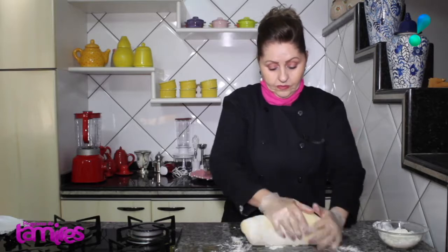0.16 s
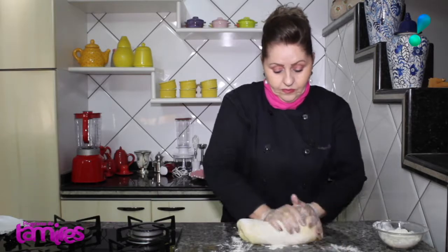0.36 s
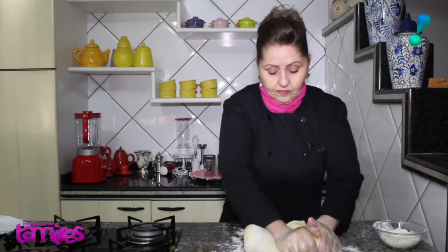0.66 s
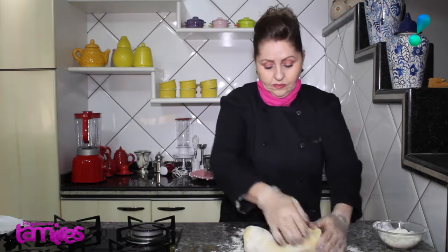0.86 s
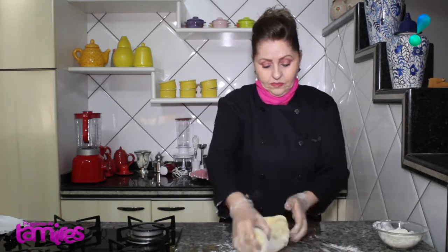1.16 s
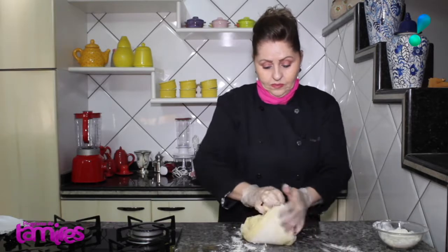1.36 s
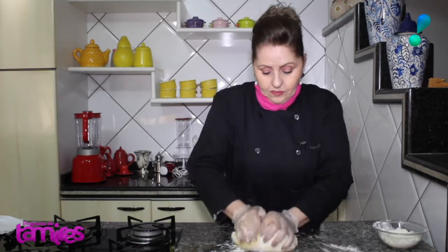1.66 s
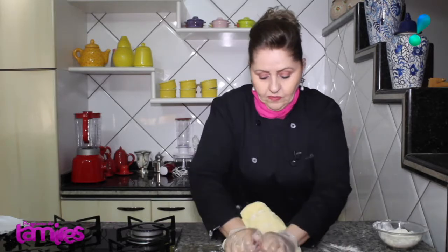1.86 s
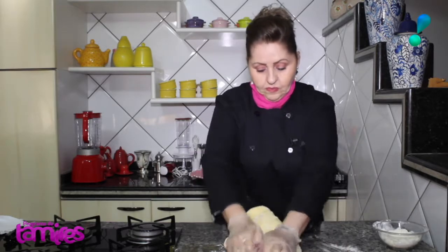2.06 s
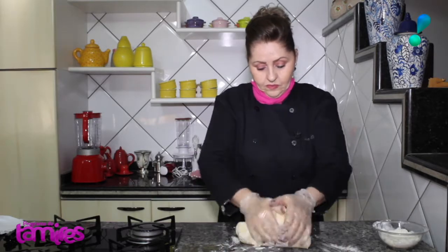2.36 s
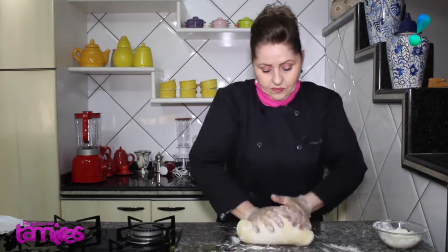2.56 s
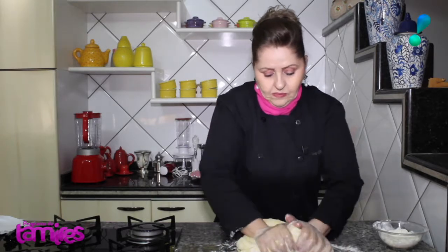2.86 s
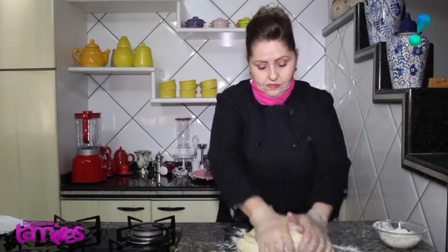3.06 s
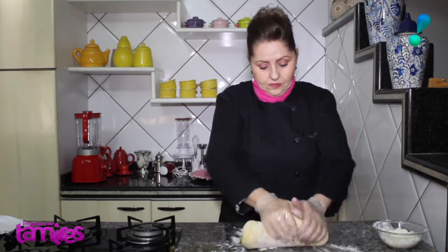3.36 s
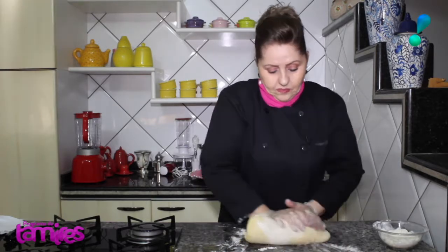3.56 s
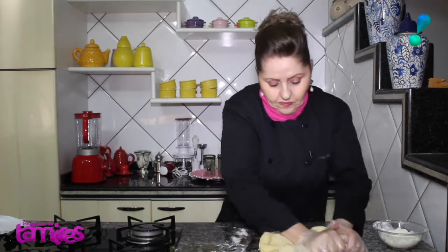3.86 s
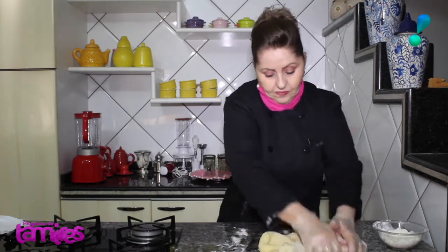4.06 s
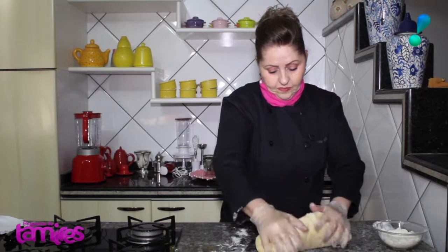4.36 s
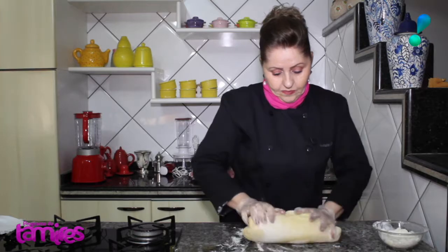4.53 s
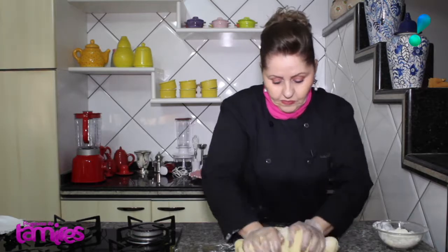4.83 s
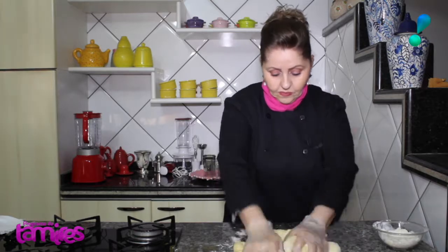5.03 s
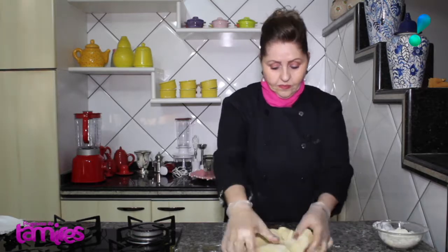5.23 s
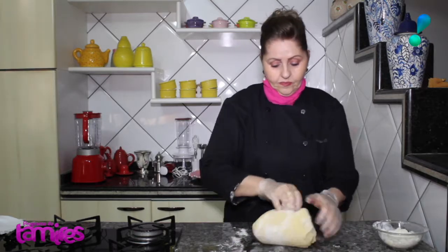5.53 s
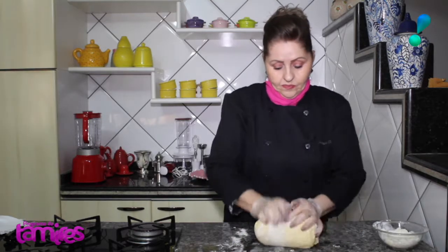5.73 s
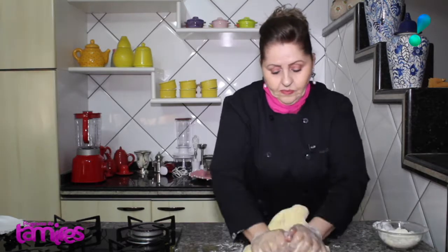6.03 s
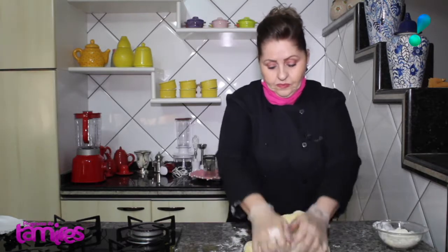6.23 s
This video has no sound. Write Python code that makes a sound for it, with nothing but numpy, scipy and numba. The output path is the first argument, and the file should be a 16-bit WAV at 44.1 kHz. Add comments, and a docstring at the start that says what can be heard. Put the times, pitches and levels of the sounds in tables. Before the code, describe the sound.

Soft crinkling of plastic film opens over faint air, then a crisp snap and dough thud arrive before one second. Irregular crackling strokes continue, each with muffled pops, little squeaks of squeezed air and sleeve-like rubbing, with calmer rustling between. After five seconds the bursts come closer together. Heard near the hands, nearly mono, in a short bright tiled kitchen.

```python
"""Hands in thin plastic gloves knead a stiff dough on a stone counter in a tiled kitchen, for 6.4 s.
The room's hush, soft rubbing and a faint rustle run throughout. Small crumples of film open the scene;
from 0.8 s firm pushes crackle, snap and pop, with the hardest slap and snap just after 4.1 s. Closer
bursts follow from 5.1 s to the end. Film is made of ringing clicks, air of shaped noise, thuds of
short falling tones; tile and wall echoes surround the hands."""
import sys
import numpy as np
from scipy import signal
from scipy.fft import rfft, irfft, next_fast_len
from scipy.io import wavfile
from numba import njit

SR = 44100
rng = np.random.default_rng(int(sys.argv[2]) if len(sys.argv) > 2 else 0)


def transcribe(signal):
    """Save signal, clipped to [-1, 1], as a 16-bit WAV file at the path in sys.argv[1]."""
    frames = np.atleast_2d(signal).T
    limited = np.clip(frames, -1, 1)
    pcm = np.round(limited * 32767).astype(np.int16)
    wavfile.write(sys.argv[1], SR, pcm)


N = 281790
STEP = 32  # samples between updates of slow controls


def from_db(db):
    """Decibels to gain."""
    return 10 ** (np.asarray(db) / 20)


def rms_one(x):
    """Scaled to rms 1."""
    return x / np.sqrt(np.mean(x ** 2) + 1e-20)


def peak_one(x):
    """Scaled to peak 1."""
    return x / np.abs(x).max()


def in_time(rows):
    """Columns of a curve at every control step."""
    s, *columns = np.transpose(rows)
    t = np.arange(N // STEP + 1) * STEP / SR
    return [np.interp(t, s, column) for column in columns]


def drift(rate_hz):
    """Slow chance of spread 1 at every control step: noise through a double smoothing."""
    r = np.exp(-2 * np.pi * rate_hz * STEP / SR)
    settle_in = 2000  # steps dropped while the smoothing fills
    white = rng.standard_normal(N // STEP + 1 + settle_in)
    return rms_one(signal.lfilter([1], [1, -2 * r, r * r], white)[settle_in:])


def coloured(white, spectrum):
    """White noise shaped to a spectrum; rms 1."""
    hz, db = np.transpose(spectrum)
    size = next_fast_len(N)
    grid = np.arange(size // 2 + 1) * SR / size + 1
    gain = from_db(np.interp(np.log(grid), np.log(hz), db))
    return rms_one(irfft(rfft(white, size) * gain, size)[..., :N])


def hush():
    """The room's steady air: shaped noise, partly its own in each channel."""
    # Each row: frequency in Hz, density of the air noise in dB per Hz (relative).
    air_colour = [(24, -51), (40, -25), (121, -5.5), (220, -4), (467, -3), (918, -7.5), (3830, -11),
                  (7730, -15.5), (12100, -18), (16000, -26)]
    level_db, alike = -54, 0.66  # alike: correlation of left and right
    mid, side = rng.standard_normal((2, N))
    stereo = np.sqrt(1 + alike) * mid + np.sqrt(1 - alike) * side * [[1], [-1]]
    return from_db(level_db) * coloured(stereo, air_colour)


def kitchen(x):
    """Walls as four feedback delays a side, duller on every round."""
    t60_s, wall_cut_hz = 0.22, 330  # decay time of the lowest notes, corner of the dulling
    size = next_fast_len(N + SR // 2)
    w = 2 * np.pi * np.arange(size // 2 + 1) / size
    dull = 1 / np.sqrt(1 + (w * SR / (2 * np.pi * wall_cut_hz)) ** 2)
    walls = np.zeros((2, len(w)), complex)
    for k, lag in enumerate(np.round(rng.uniform(0.008, 0.054, size=8) * SR)):
        loop = from_db(-60 * lag / SR / t60_s) * dull * np.exp(-1j * w * lag)
        walls[k % 2] += loop / (1 - loop) * (-1) ** (k // 2)
    return irfft(rfft(x, size) * walls, size)[:, :N]


def tiles(x):
    """One bright early echo off the tiles, a little later on the right."""
    left_s, right_s = 0.0031, 0.0047
    return np.array([np.pad(x, (round(s * SR), 0))[:N] for s in (left_s, right_s)])


def rub():
    """Low, slightly lumpy friction of sleeves and of dough dragged over the stone, as shaped noise."""
    # Each row: time in seconds, rubbing level in dB before the lumps.
    strokes = [(0.0, -63.5), (0.59, -59), (0.69, -57), (1.07, -55.5), (1.23, -59.5), (1.55, -60),
               (2.06, -49), (2.26, -57), (2.69, -61.5), (2.97, -51), (3.31, -61), (3.98, -51), (4.45, -57),
               (4.57, -56), (4.73, -66.5), (5.29, -47), (5.57, -55), (6.39, -50.5)]
    # Each row: frequency in Hz, density of the friction noise in dB per Hz (relative).
    friction_colour = [(24, -51), (40, -26), (118, 0), (209, 1.5), (458, -1.5), (927, -8.5), (2000, -9),
                       (2600, -19), (4400, -120)]
    lumps_db = 2 * drift(25)
    steps = from_db(in_time(strokes)[0] + lumps_db)
    level = np.interp(np.arange(N) / STEP, np.arange(len(steps)), steps)
    return level * coloured(rng.standard_normal(N), friction_colour)


def ring(clicks, hz, t60):
    """A unit click sets a sine of starting height 1 ringing, 60 dB down after t60 seconds."""
    r, w = from_db(-60 / (t60 * SR)), 2 * np.pi * hz / SR
    return signal.lfilter([0, np.sin(w)], [1, -2 * r * np.cos(w), r * r], clicks + 1e-18)


def thuds():
    """A pop of a few cycles, falling in pitch, with a small knock on top and the counter's dull notes."""
    # Dough meets stone or lets go of air. Each row: start in seconds, peak of the pop in dB,
    # reference pitch of the pop in Hz, strength of the blow on the counter in dB.
    blows_on_stone = [(0.282, -49, 470, -51), (0.76, -33.5, 447, -60), (0.804, -33, 517, -57),
                      (0.819, -26, 477, -63), (0.831, -34, 520, -57), (1.179, -43, 444, -73),
                      (1.255, -37, 344, -65), (1.576, -41.5, 547, -57), (1.623, -33, 483, -54),
                      (1.911, -25.5, 470, -62), (2.134, -28, 525, -80), (2.453, -50, 316, -49),
                      (2.631, -37, 370, -59), (2.927, -51, 360, -54), (3.027, -24.5, 560, -37.5),
                      (3.105, -33.5, 475, -64), (3.504, -54, 544, -50.5), (4.04, -53, 501, -54),
                      (4.121, -24, 322, -48), (4.125, -40, 337, -52), (4.41, -42, 320, -50.5),
                      (4.795, -38.5, 534, -60), (5.097, -34, 334, -34.5), (5.826, -27, 377, -44.5),
                      (5.845, -37, 483, -54), (6.026, -28.5, 514, -46), (6.264, -33, 467, -67)]
    # Notes of the stone counter. Each row: frequency in Hz, gain in dB, decay t60 in seconds.
    counter_notes = [(130, 10, 0.023), (205, 15, 0.017)]
    out, blows, t = np.zeros(N + 2000), np.zeros(N), np.arange(2000) / SR
    for s, db, hz, counter_db in blows_on_stone:
        cycles = hz * t
        falling_phase = 2 * np.pi * 8.43 * (1 - np.exp(-cycles / 7.06))
        pop = np.sin(falling_phase) * from_db(-60 * cycles / 8.0)
        knock = 0.4 * np.sin(2 * np.pi * 2.2 * cycles) * from_db(-60 * cycles / 2.5)
        onset = 1 - np.exp(-cycles / 0.24)
        at = round(s * SR)
        out[at:at + 2000] += from_db(db) * peak_one((pop + knock) * onset)
        blows[at + round(0.0015 * SR)] = from_db(counter_db)
    # dough is a soft hammer
    band = signal.butter(2, [95, 400], "band", fs=SR, output="sos")
    soft = signal.sosfilt(band, blows + 1e-18)
    return out[:N] + sum(from_db(db) * ring(soft, hz, t60) for hz, db, t60 in counter_notes)


def slaps():
    """A short broad puff of air from under the palm: a decaying band of noise."""
    # A palm lands flat on the dough. Each row: start in seconds, peak in dB.
    palms = [(0.811, -39), (0.831, -27.5), (3.095, -40.5), (4.111, -28.5), (4.127, -21), (5.112, -37),
             (6.242, -33), (6.269, -34)]
    out, t = np.zeros(N + 2500), np.arange(2500) / SR
    band = signal.butter(2, [450, 1700], "band", fs=SR, output="sos")
    shape = from_db(-60 * t / 0.096) * (1 - np.exp(-t / 0.0005))
    for (s, db), white in zip(palms, rng.standard_normal((len(palms), 2500))):
        at = round(s * SR)
        out[at:at + 2500] += from_db(db) * peak_one(signal.sosfilt(band, white * shape))
    return out[:N]


def pockets():
    """Escaping air whistles: a gliding tone with a noisy strength, its breadth a share of its pitch."""
    # Air squeezed out of a pocket in glove or dough. Each row: start in seconds, length in seconds,
    # first pitch in Hz, last pitch in Hz, rms level in dB before the fade in and out.
    whistles = [(0.816, 0.033, 2550, 2520, -56), (0.892, 0.045, 10600, 12640, -40.5),
                (1.151, 0.054, 4090, 3745, -44), (1.54, 0.026, 2215, 2240, -46.5),
                (2.114, 0.05, 2066, 1850, -36.5), (2.127, 0.046, 8720, 9540, -37),
                (2.356, 0.017, 12500, 12000, -41.5), (2.682, 0.038, 2780, 2950, -43),
                (3.589, .07, 2770, 2876, -42.5), (3.783, 0.057, 502, 680, -44.5),
                (4.111, 0.021, 4980, 4920, -34.5), (4.12, .025, 1260, 1300, -39),
                (4.161, 0.023, 5800, 5860, -44.5), (4.168, 0.047, 11700, 11900, -48),
                (5.11, 0.018, 7000, 6800, -31.5), (5.287, 0.14, 1910, 1696, -41),
                (5.8, 0.027, 7060, 7040, -41), (5.974, 0.041, 8100, 8000, -39.5),
                (6.255, 0.025, 1742, 1830, -41)]
    out = np.zeros(N)
    for s, length, first_hz, last_hz, db in whistles:
        n, at = round(length * SR), round(s * SR)
        phase = 2 * np.pi * np.cumsum(np.linspace(first_hz, last_hz, n)) / SR
        low = signal.butter(2, 0.097 * first_hz, fs=SR, output="sos")
        hoarse = signal.sosfilt(low, rng.standard_normal((2, 9000)))[:, -n:]
        tone = rms_one(hoarse[0] * np.sin(phase) + hoarse[1] * np.cos(phase))
        fade = np.sin(np.linspace(0, np.pi, n)) ** 0.21
        out[at:at + n] += from_db(db) * tone * fade
    return out


def patch(clicks, hz, cycles):
    """A small piece of film: a resonance passed twice, so that it is heard only near its pitch."""
    r, w = from_db(-60 * hz / (cycles * SR)), 2 * np.pi * hz / SR
    resonance = [0.65, 0.0039, -1.05, 1, -2 * r * np.cos(w), r * r]
    return signal.sosfilt([resonance] * 2, clicks + 1e-18)


def snaps():
    """A crease flips over: a ring of a few cycles with a duller partner below it."""
    # Single creases. Each row: start in seconds, peak in dB of snap and rustle together, ring in Hz.
    creases = [(0.4459, -30, 5230), (0.8018, -18, 5570), (0.827, -17, 2540), (0.8349, -10.5, 2530),
               (1.1837, -21, 3650), (1.232, -19, 4230), (1.5924, -18, 10800), (1.662, -16, 10900),
               (2.1247, -17, 1670), (2.1294, -11, 2500), (2.144, -15.5, 2640), (2.15, -15, 2880),
               (2.1726, -20, 3700), (2.199, -23, 2270), (2.6968, -33, 10700), (3.0913, -15.5, 2700),
               (3.1088, -14, 2230), (3.607, -18.5, 4300), (4.127, -11.5, 3850), (4.1339, -9, 2980),
               (4.368, -26.5, 5900), (4.3845, -21, 4750), (4.795, -29, 4730), (5.112, -12, 5230),
               (5.122, -16.5, 3830), (5.1276, -19, 3160), (5.2857, -9, 5300), (5.2916, -12, 5900),
               (5.3024, -21, 5200), (5.32, -17, 3880), (5.7218, -10.5, 5500), (5.7424, -22, 6500),
               (5.9698, -15, 8200), (6.2432, -14, 6770), (6.264, -22, 1640), (6.2745, -10, 5170)]
    snap_share = 0.4  # part of that peak given to the snap, leaving room for the rustle under it
    out = np.zeros(N + 900)
    click = np.zeros(900)
    click[0] = 1
    for (s, db, hz), ratio in zip(creases, rng.uniform(0.61, 0.62, len(creases))):
        main = peak_one(patch(click, hz, cycles=12.3))
        partner = peak_one(patch(click, hz * ratio, cycles=2.65))
        at = round(s * SR)
        out[at:at + 900] += snap_share * from_db(db) * peak_one(main + 0.55 * partner)
    return out[:N]


def crumpling():
    """Crumples add their power to a faint rustle; the creases' pitch leans to the strongest fold."""
    # A hand crumples its glove. Each row: time of full strength in seconds, rise, hold and fall in
    # seconds, coarse creases in dB, their pitch in Hz, fine hiss in dB, topmost hiss in dB.
    # The levels are controls, shared out among the patches of film later.
    crumples = [ (0.284, 0.046, .0, 0.065, -48.5, 3930, -48.5, -40.5),
                (0.445, .004, .0, 0.023, -54, 4300, -41.5, -65),
                (0.533, 0.098, .0, 0.13, -48, 4350, -42, -43),
                (0.803, 0.024, 0.023, .05, -52, 3000, -41, -46),
                (0.838, 0.028, .0, 0.017, -25, 3340, -32.5, -33.5),
                (0.891, 0.034, 0.014, 0.043, -49, 3200, -46.5, -34.5),
                (1.157, 0.49, 0.044, 0.11, -50, 3600, -52, -51),
                (1.229, 0.022, 0.009, .06, -42, 4260, -43.5, -53.5),
                (1.538, 0.007, 0.07, 0.035, -36.5, 3530, -31, -26),
                (1.79, 0.072, 0.062, 0.11, -41.5, 4030, -38, -37),
                (2.144, 0.053, 0.0097, .07, -32, 1950, -40.5, -42),
                (2.357, 0.0064, 0.011, 0.091, -47, 3750, -52, -45),
                (2.418, .006, .0, .08, -58, 3800, -49.5, -46),
                (2.538, 0.17, .0, 0.077, -55.5, 2930, -52, -60),
                (2.686, 0.015, 0.027, 0.053, -44, 2890, -30, -30.5),
                (2.805, 0.077, 0.067, 0.13, -49.5, 3560, -43, -39.5),
                (3.09, .006, .0, 0.026, -38, 2730, -31.5, -41),
                (3.107, 0.023, .0, 0.025, -25, 2600, -30, -32),
                (3.365, 0.0081, .0, .1, -63, 2700, -50, -48.5),
                (3.597, 0.044, 0.059, 0.11, -41.5, 3600, -41, -36.5),
                (3.728, .05, 0.034, 0.39, -47, 3550, -44.5, -41.5),
                (4.108, .07, 0.024, 0.12, -39, 3070, -55, -52),
                (4.125, 0.023, 0.0026, 0.048, -34.5, 3040, -37.5, -40),
                (4.2, .04, 0.0051, .03, -64, 3100, -49, -47),
                (4.257, 0.059, .0, 0.026, -58, 2900, -48, -46),
                (4.314, 0.021, 0.032, .04, -68, 3200, -53.5, -59),
                (4.369, .008, 0.025, 0.08, -52, 3800, -50, -55),
                (4.516, .15, .0, .3, -56.5, 2600, -55.5, -57),
                (4.805, 0.098, 0.088, 0.13, -54.5, 3670, -51.5, -52),
                (5.111, 0.012, 0.0047, 0.062, -34.5, 2770, -38.5, -35.5),
                (5.268, 0.1, 0.017, 0.11, -40, 2810, -47, -50),
                (5.285, .004, 0.016, .15, -32.5, 2920, -34, -49.5),
                (5.398, .1, .0, 0.14, -39, 2500, -44.5, -44),
                (5.469, 0.036, .0, .06, -61, 2700, -47, -42.5),
                (5.657, .006, .0, 0.018, -54, 2980, -61, -37.5), (5.78, .03, 0, .04, -50, 3700, -43, -50),
                (5.71, 0.004, 0.033, 0.036, -34, 4000, -31.5, -33),
                (5.808, .04, 0.0031, 0.059, -41, 3400, -39, -40.5),
                (5.885, .015, .0, .03, -50, 4300, -48, -65),
                (5.97, 0.045, 0.043, 0.084, -48.5, 3760, -42, -39.5),
                (6.241, 0.022, 0.011, 0.055, -40, 2200, -38, -38),
                (6.273, 0.03, .0, 0.028, -30.5, 2450, -28.5, -38.5)]
    # Moving hands between crumples. Each row: time in seconds, coarse creases in dB (same control).
    moving_hands = [(0.0, -52.5), (0.1, -73), (0.43, -64), (0.7, -66), (1.0, -56.5), (1.34, -68),
                    (1.52, -56.5), (2.06, -54), (2.5, -60.5), (2.65, -71), (3.06, -53), (3.35, -61),
                    (3.5, -57), (4.05, -62), (4.3, -79), (4.72, -82), (5.09, -59), (5.69, -63), (6.2, -57),
                    (6.39, -56)]
    fidget_hz, fidget_fine_db, fidget_top_db = 2840, 0, -4  # hiss relative to the creases
    edge_db = 20  # what a rise gains and a fall loses in its time
    settle_db, settle_db_per_s = -24, 112  # the film goes on settling faintly after each crumple
    t = np.arange(N // STEP + 1) * STEP / SR
    s, rise, hold, fall, coarse_db, hz, fine_db, top_db = np.transpose(crumples)[..., None]
    after = np.maximum(t - s - np.maximum(hold, 0), 0)
    rising = from_db(-edge_db * np.maximum(s - t, 0) / rise) ** 2
    falling = from_db(-edge_db * after / fall) ** 2
    settling = from_db(settle_db - settle_db_per_s * after) ** 2
    power = rising * (falling + settling)
    fidget = from_db(in_time(moving_hands)[0]) ** 2
    creases = from_db(coarse_db) ** 2 * power
    coarse = fidget + creases.sum(axis=0)
    pitch = (fidget * fidget_hz + (creases * hz).sum(axis=0)) / coarse
    fine = fidget * from_db(fidget_fine_db) ** 2 + (from_db(fine_db) ** 2 * power).sum(axis=0)
    top = fidget * from_db(fidget_top_db) ** 2 + (from_db(top_db) ** 2 * power).sum(axis=0)
    return 10 * np.log10(coarse), pitch, 10 * np.log10(fine), 10 * np.log10(top)


@njit
def wandering_patch(clicks, hz, cycles, rate, step):
    """A double resonance while the film is reshaped: its pitch follows hz."""
    out = clicks.copy()
    for _ in range(2):
        x1 = x2 = y1 = y2 = a1 = a2 = 0.0
        for i in range(len(out)):
            if i % step == 0:
                now_hz = hz[i // step]
                r = 10 ** (-3 * now_hz / (cycles * rate))
                a1, a2 = 2 * r * np.cos(2 * np.pi * now_hz / rate), r * r
            y = out[i] - x2 + a1 * y1 - a2 * y2
            x2, x1, y2, y1 = x1, out[i], y1, y
            out[i] = y
    return out


def film(level_db_at, low_hz, high_hz, per_s, uneven_db, cycles, patchy_db, wander, count):
    """Tiny buckles in clumps, dealt to patches of many sizes that come, go and drift in pitch."""
    sizes = from_db(uneven_db * np.minimum(rng.exponential(1, N), 5)) * rng.choice([-1, 1], N)
    born = rng.random(N) < per_s / SR
    dealt = rng.integers(0, count, N)
    clumps_db = 1.02 * drift(85)
    out = np.zeros(N)
    for k, rest_hz in enumerate(np.geomspace(low_hz, high_hz, count)):
        hz = np.minimum(rest_hz * np.exp(wander * drift(9.9)), 0.4 * SR)
        level_db = level_db_at(hz) + clumps_db + patchy_db * drift(28)
        strength = from_db(level_db) * np.sqrt(hz / high_hz)  # high patches span more Hz, so carry more
        buckles = sizes * born * (dealt == k) + 1e-18
        # the patch's own loudness is divided out
        norm = np.std(wandering_patch(buckles[:N // 2], hz, cycles, SR, STEP))
        driven = buckles * np.repeat(strength, STEP)[:N]
        out += wandering_patch(driven, hz, cycles, SR, STEP) / norm
    return out


def gloves():
    """Large folds crackle around one moving pitch; taut film hisses densely, its top on its own level."""
    coarse_db, coarse_hz, fine_db, top_db = crumpling()

    def folds_db(hz):
        """Level of a fold, steeper below the main pitch than above it."""
        octaves = np.log2(hz / coarse_hz)
        # each patch carries a share of the level
        return coarse_db - 7.0 - np.where(octaves < 0, 22.0, 9.0) * octaves ** 2

    def taut_db(hz):
        """Level of the hiss, gliding from fine to topmost and falling off at the edge."""
        towards_top = np.clip(np.log2(hz / 6800) / 0.6, 0, 1)
        edge_db = 42.0 * np.maximum(np.log2(hz / 12500), 0)
        return fine_db - 8 + towards_top * (top_db - fine_db - 1) - edge_db

    coarse = film(folds_db, 1073, 4820, per_s=5500, uneven_db=1.5, cycles=15.4,
                  patchy_db=0.0, wander=0.051, count=14)
    fine = film(taut_db, 4595, 15630, per_s=20000, uneven_db=0.5, cycles=37.0,
                patchy_db=2.5, wander=0.023, count=22)
    return coarse + fine


def scene():
    """Everything at the hands sits in the middle; tiles, walls and the hush spread it a little."""
    tile_echo_db, kitchen_db = -25, -21
    hands = rub() + thuds() + slaps() + pockets() + snaps() + gloves()
    room = from_db(tile_echo_db) * tiles(hands) + from_db(kitchen_db) * kitchen(hands)
    return hush() + room + hands


def record(dry):
    """The microphone channel: the bass is rolled off below 72 Hz, the top is cut at 15.9 kHz."""
    lean = signal.sosfilt(signal.butter(3, 72, "high", fs=SR, output="sos"), dry)
    return signal.sosfilt(signal.ellip(12, 0.5, 75, 15900, fs=SR, output="sos"), lean)


dry = scene()
out = record(dry)
transcribe(out)
```